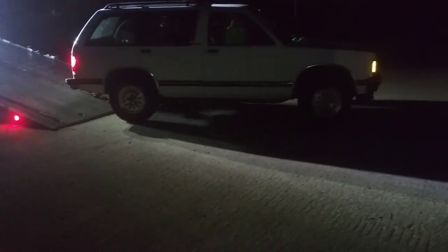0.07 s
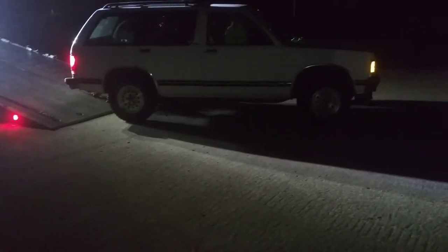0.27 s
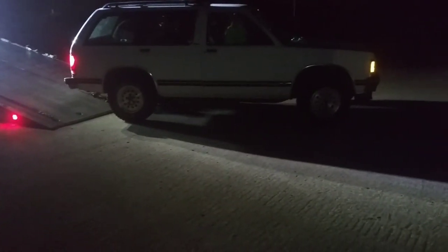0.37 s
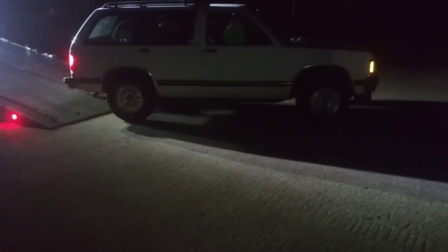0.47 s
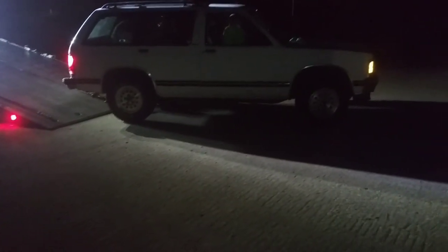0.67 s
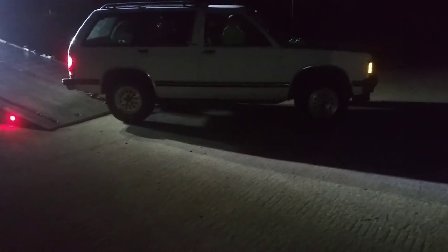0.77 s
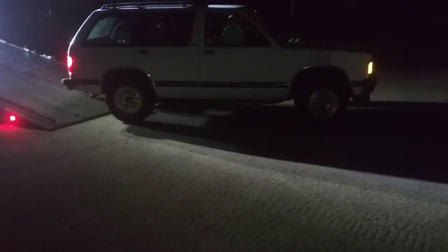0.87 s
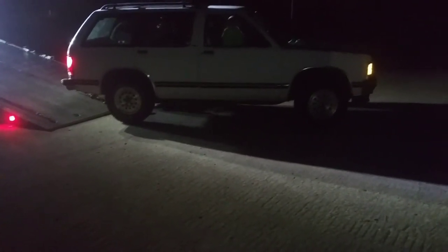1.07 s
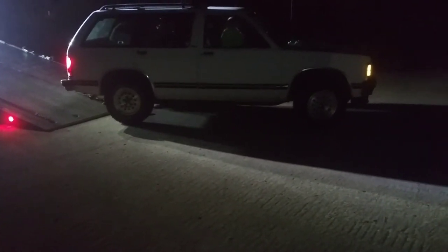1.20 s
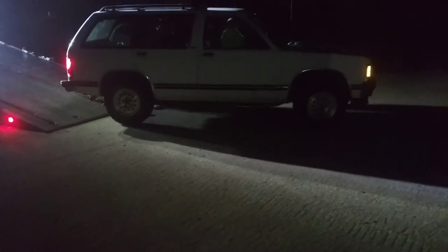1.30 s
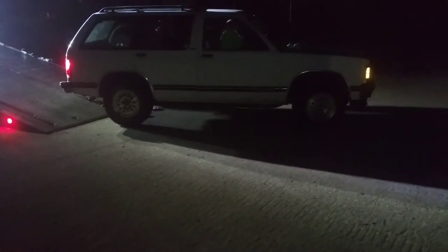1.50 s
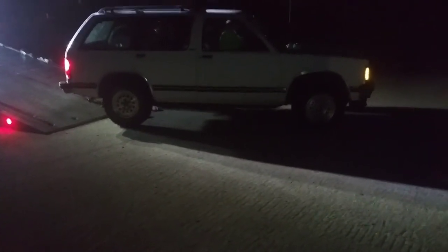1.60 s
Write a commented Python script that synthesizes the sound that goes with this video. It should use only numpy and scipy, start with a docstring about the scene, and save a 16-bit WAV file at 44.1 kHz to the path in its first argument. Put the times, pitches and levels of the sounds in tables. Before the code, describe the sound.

Sharp, ringing clank of dropped steel over a tow truck's steady engine and hydraulic whine.

```python
"""A tow truck stands outdoors, its diesel on fast idle and its hydraulic pump whining throughout.
About a quarter of a second in, a piece of steel gear drops close by: it strikes with a crack and
tumbles, ringing and squealing as it slides. It lands again and skitters to rest with a hollow rattle.
A limiter holds the loud clank down and ducks the engine under it.
The ringing and its faint echoes die away, and the truck runs on."""
import sys
import numpy as np
from scipy import signal
from scipy.fft import rfft, irfft, next_fast_len
from scipy.io import wavfile
from scipy.ndimage import uniform_filter1d, minimum_filter1d

SR = 44100
rng = np.random.default_rng(int(sys.argv[2]) if len(sys.argv) > 2 else 0)


def generate_wav(signal):
    """Clip the signal to [-1, 1] and save it as 16-bit WAV at the path in sys.argv[1]."""
    frames = np.transpose(np.atleast_2d(signal))
    scaled = np.clip(frames, -1, 1) * 32767
    pcm = np.round(scaled).astype(np.int16)
    wavfile.write(sys.argv[1], SR, pcm)


N = 72765
T = np.arange(N) / SR

# the engine's hum: (multiple of the engine's cycle rate, level [dB])
ENGINE_TONES = [(6, -59.5), (9, -54), (12, -48.5), (15, -60), (18, -57.5), (21, -55.5), (23, -45.5),
                (24, -47.5), (28, -57.5), (54, -73), (108, -60.5), (174, -49), (186, -46), (237, -47)]
# the pump's whine: (multiple of the pump's pitch, level [dB])
PUMP_TONES = [(1, -47), (2, -50.5), (3, -42.5), (4, -54.5), (5, -50.5), (6, -52)]
# tone colour of the diesel clatter: (frequency [Hz], relative level [dB])
CLATTER_COLOUR = [(25, -46), (60, -20), (120, -10), (250, -2), (430, -11.5), (560, -4.5), (950, -5.5),
                  (1300, -1.5), (1750, 3.5), (2000, -2.5), (2200, -5), (2450, -2), (3000, -12), (4400, -18),
                  (4950, -7), (5700, -24.5), (8000, -12.5), (16000, -52)]
# tone colour of the truck's hiss: (frequency [Hz], relative level [dB])
HISS_COLOUR = [(2000, -15), (6000, -10.5), (8000, -17.5), (8900, 1), (9300, -4.5), (10000, -12),
               (12000, -16.5), (13500, -23), (15500, -22.5)]
# the four blows on the steel: (time [s], knock level [dB])
BLOWS = [(0.243, 6.5), (0.363, -11), (.423, -20), (0.484, -35)]
# tone colour of a knock: (frequency [Hz], relative level [dB])
KNOCK_COLOUR = [(60, -43), (150, -16), (600, -10.5), (1000, -4), (1450, 3.5), (2300, 2), (3500, -12),
                (6000, -13), (8800, 3.5), (11000, -21), (16000, -51)]
# the tones the steel rings with:
# (frequency [Hz], strength at blow 1, 2, 3 and 4 [dB], time to fade by 60 dB [s], swell time [s])
STEEL_TONES = [(1416, -26, -38, -43, -39, 0.5, 0.006), (2099, -16, -30, -31, -46, 0.46, 0.02),
               (3970, -18, -25, -27, -35, 0.4, 0.018), (4724, -25, -17, -33, -37, 0.38, 0.012),
               (5763, -18, -32, -26, -31, 0.32, 0.016), (5915, -12, -27, -27, -26, 0.24, 0.01),
               (6950, -12, -19, -28, -41, 0.42, 0.038), (7150, -12, -17, -21, -39, 0.39, 0.033),
               (7674, 2, -14, -18, -37, 0.41, 0.014), (8160, -2, -9, -11, -35, 0.36, 0.006),
               (8268, -1, -8, -11, -33, 0.34, 0.006), (8510, -7, -12, -12, -34, 0.2, 0.004),
               (8598, -2, -9, -11, -32, 0.35, 0.009), (8672, -2, -9, -14, -32, 0.42, 0.009),
               (8760, -2, -9, -13, -32, 0.36, 0.012), (8870, -8, -13, -16, -36, 0.3, 0.002),
               (9641, 2, -14, -19, -33, 0.49, 0.025), (10043, -3, -14, -16, -39, 0.42, 0.015),
               (10830, -10, -19, -22, -46, 0.45, 0.04), (11676, -7, -8, -44, -49, 0.29, 0.017),
               (12410, -21, -29, -28, -52, 0.37, 0.008), (12830, -18, -29, -33, -52, 0.35, 0.024),
               (13135, -17, -28, -30, -52, 0.41, 0.022), (13780, -12, -29, -22, -48, 0.36, 0.012),
               (14620, -28, -27, -14, -23, 0.29, 0.012), (14973, -28, -26, -12, -20, 0.31, 0.012)]
# how hard the steel skitters: (time [s], level [dB])
SKITTER_LEVELS = [(.245, -15.5), (.30, -28), (.358, -30.5), (.367, -7.5), (.388, -8.5), (.42, -15),
                  (.48, -25.5), (.53, -33), (.60, -38), (.75, -40)]
# tone colour of the skitter: (frequency [Hz], relative level [dB])
SKITTER_COLOUR = [(100, -28), (330, -25.5), (520, -0.5), (1000, -9.5), (1600, -1), (2400, 3.5), (3600, 0),
                  (5500, -3), (7000, 2.5), (8600, 3), (10500, -1), (16000, -32.5)]
# short rings that the skitter sets off: (frequency [Hz], width [Hz], gain [dB])
SKITTER_RINGS = [(1020, 66, -19), (1585, 73, -6), (2310, 74, -8.5), (2875, 36, -15.5)]
# hollow rings as the piece settles: (frequency [Hz], width [Hz], gain [dB])
SETTLE_RINGS = [(196, 24, -41), (376, 70, -41.5), (600, 200, -39.5), (848, 73, -35)]


def from_db(db):
    """Turn decibels into a number to multiply a sound by."""
    return 10 ** (np.asarray(db) / 20)


def unit_power(x):
    """Scale a signal so that its average power is 1."""
    return x / np.sqrt(np.mean(x ** 2) + 1e-20)


def drift(per_s):
    """A smooth random wander of typical size 1 that changes about per_s times a second."""
    step, warm_up = 40, 2000
    memory = np.exp(-2 * np.pi * step * per_s / SR)
    noise = rng.standard_normal(N // step + warm_up + 2)
    slow = signal.lfilter([1], [1, -2 * memory, memory ** 2], noise)[warm_up:]
    return np.interp(np.arange(N) / step, np.arange(len(slow)), unit_power(slow))


def colour(x, points):
    """Give a sound the tone colour in a table; plain noise keeps its overall power."""
    hz, db = np.transpose(points)
    size = 2 * next_fast_len(N)
    grid_hz = np.arange(size // 2 + 1) * SR / size + 1
    gain = unit_power(from_db(np.interp(np.log(grid_hz), np.log(hz), db)))
    # fold the filter forward in time, so that nothing sounds before its cause
    cepstrum = irfft(np.log(gain))
    cepstrum[1:size // 2] *= 2
    cepstrum[size // 2 + 1:] = 0
    return irfft(rfft(x, size) * np.exp(rfft(cepstrum)))[:N]


def shaft_tones(turns, tones):
    """Hum or whine: a turning part makes tones at whole multiples of its rate."""
    return sum(np.sqrt(2) * from_db(db) * np.sin(2 * np.pi * (multiple * turns + rng.random()))
               for multiple, db in tones)


def diesel_clatter(cycles, cycle_hz, cylinders=6, firing_depth=0.18, repeat_share=0.34, db=-34.5):
    """A rattle that partly repeats every engine cycle and swells as each cylinder fires."""
    place_in_cycle = (cycles % 1 * SR / cycle_hz).astype(int)
    repeating = rng.standard_normal(N)[place_in_cycle]
    rattle = np.sqrt(repeat_share) * repeating + np.sqrt(1 - repeat_share) * rng.standard_normal(N)
    firing = 1 + firing_depth * np.cos(2 * np.pi * cylinders * cycles)
    return from_db(db) * unit_power(colour(rattle * firing, CLATTER_COLOUR))


def truck(cycle_hz=10.4, pump_hz=262.2, speed_wander=0.0011, hiss_db=-40):
    """Engine and pump turn together at a slightly wandering speed, with a high hiss on top."""
    shaft_s = np.cumsum(1 + speed_wander * drift(per_s=2.7)) / SR
    cycles = cycle_hz * shaft_s
    hum = shaft_tones(cycles, ENGINE_TONES)
    whine = shaft_tones(pump_hz * shaft_s, PUMP_TONES)
    clatter = diesel_clatter(cycles, cycle_hz)
    hiss = from_db(hiss_db) * colour(rng.standard_normal(N), HISS_COLOUR)
    return hum + whine + clatter + hiss


def knocks(fade_s=0.018):
    """Each blow makes a short, hard crack: a burst of noise that dies at once."""
    bursts = sum((T >= start) * from_db(db - 60 * np.maximum(T - start, 0) / fade_s)
                 for start, db in BLOWS)
    return colour(bursts * rng.standard_normal(N), KNOCK_COLOUR)


def waver(hz, tumble_db=3.32, tumble_per_s=19.5, pitch_share=0.00086, shiver_depth=0.29, shiver_per_s=84):
    """One tone sways in pitch and strength as the steel turns, and shivers as it chatters."""
    # complex numbers carry both a tone's strength and its place in the wave
    sway = np.exp(2j * np.pi * hz * pitch_share * np.cumsum(drift(tumble_per_s)) / SR)
    shiver = 1 + shiver_depth * (drift(shiver_per_s) + 1j * drift(shiver_per_s))
    return from_db(tumble_db * drift(tumble_per_s)) * shiver * sway


def steel_ring():
    """Each blow feeds every tone of the steel, which swells, wavers and dies away."""
    ring = np.zeros(N)
    for hz, *levels_db, fade_s, swell_s in STEEL_TONES:
        unsteady = waver(hz)
        for (start, _), db in zip(BLOWS, levels_db):
            age = np.maximum(T - start, 0)
            strength = from_db(db - 60 * age / fade_s) * (1 - np.exp(-age / swell_s))
            tone = np.real(unsteady * np.exp(2j * np.pi * (hz * age + rng.random())))
            ring += np.sqrt(2) * strength * tone
    return ring


def squeal(hz=3288, peak_s=0.39, peak_db=-14, rise_db_per_s=62, fall_db_per_s=212):
    """Sliding after the first blow builds up one tone, which fades once the steel lands again."""
    past_peak_s = T - peak_s
    db = peak_db + np.minimum(rise_db_per_s * past_peak_s, -fall_db_per_s * past_peak_s)
    tone = np.real(waver(hz) * np.exp(2j * np.pi * hz * T))
    after_first_blow = T > BLOWS[0][0]
    return np.sqrt(2) * after_first_blow * from_db(db) * tone


def contacts(per_s=4000, spread_db=2):
    """Many tiny taps of uneven size at random times."""
    sizes = from_db(spread_db * np.minimum(rng.exponential(1, N), 4))
    signs = rng.choice([-1, 1], N)
    touching = rng.random(N) < per_s / SR
    return unit_power(sizes * signs * touching)


def resonate(taps, rings):
    """Taps set off a short ring at each pitch in a table; narrower rings last longer."""
    out = 0
    for hz, width_hz, db in rings:
        decay = np.exp(-np.pi * width_hz / SR)
        feed = np.sqrt((1 - decay ** 2) / 2) * np.array([1, 0, -1])
        feedback = [1, -2 * decay * np.cos(2 * np.pi * hz / SR), decay ** 2]
        out = out + from_db(db) * signal.lfilter(feed, feedback, taps + 1e-18)
    return out


def skitter():
    """The steel grates and chatters brightly in a dense run of small contacts."""
    times, levels_db = np.transpose(SKITTER_LEVELS)
    grating = contacts() * from_db(np.interp(T, times, levels_db, left=-120, right=-120))
    return colour(grating, SKITTER_COLOUR) + resonate(grating, SKITTER_RINGS)


def settle(middle_s=0.474, half_length_s=0.06):
    """A brief swell of contacts makes a lower, hollow rattle as the piece comes to rest."""
    swell = np.exp(-((T - middle_s) / half_length_s) ** 2 / 2)
    return resonate(contacts() * swell, SETTLE_RINGS)


def yard_echoes(sound, db=-28, delay_s=0.061, fade_s=1, dull_hz=9000):
    """Sound bounces back from vehicles and the ground as a faint, dulled scatter."""
    tail = rng.standard_normal(N) * from_db(-60 * T / fade_s) * (T > delay_s)
    tail /= np.sqrt(np.sum(tail ** 2))
    dulled = signal.sosfilt(signal.butter(2, dull_hz, fs=SR, output="sos"), sound)
    return from_db(db) * signal.fftconvolve(dulled, tail)[:N]


def scene():
    """The clank and its echoes over the running truck, in one channel."""
    clank = steel_ring() + squeal() + knocks() + skitter() + settle()
    return (clank + yard_echoes(clank) + truck())[None]


def duck(sound, limit_db=-8, detect_s=0.0047, release_db_per_s=157):
    """Turn everything down when it gets too loud, then let it come back up gradually."""
    power = uniform_filter1d(sound ** 2, int(detect_s * SR))
    over_db = np.maximum(10 * np.log10(np.maximum(power, 1e-12)) - limit_db, 0)
    release_db = release_db_per_s * T
    cut_db = np.maximum.accumulate(over_db + release_db, axis=-1) - release_db
    return sound * from_db(-uniform_filter1d(cut_db, size=64))


def limit_peaks(sound, ceiling=0.79, hold_s=0.00025):
    """Quickly push down any spike that pokes above the ceiling."""
    hold = int(hold_s * SR)
    gain = minimum_filter1d(ceiling / np.maximum(np.abs(sound), ceiling), hold)
    return sound * uniform_filter1d(gain, hold)


def record(dry):
    """Hold down the loud moments, catch the spikes, then cut off the very highest treble."""
    limited = limit_peaks(duck(dry))
    treble_cut = signal.firwin(401, cutoff=15600, fs=SR)
    return signal.fftconvolve(limited, treble_cut[None], "same")


dry = scene()
out = record(dry)
generate_wav(out)
```